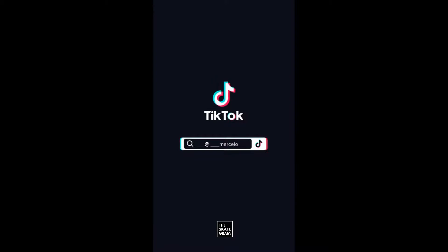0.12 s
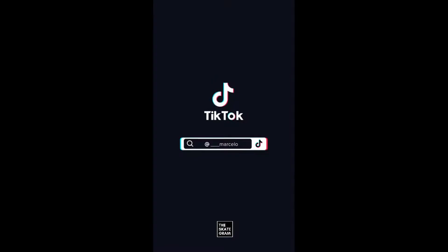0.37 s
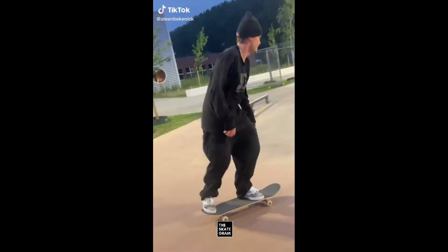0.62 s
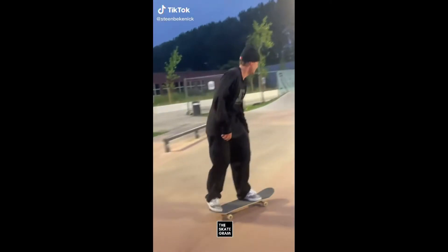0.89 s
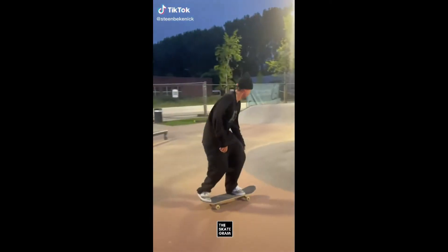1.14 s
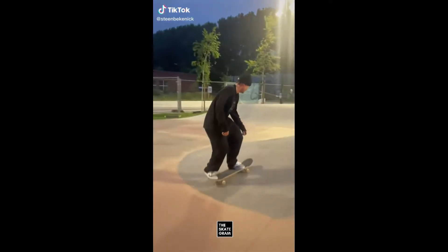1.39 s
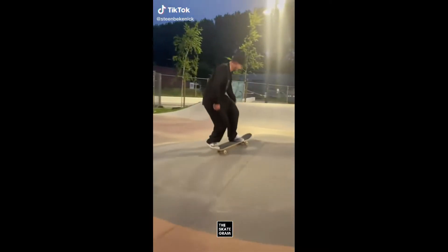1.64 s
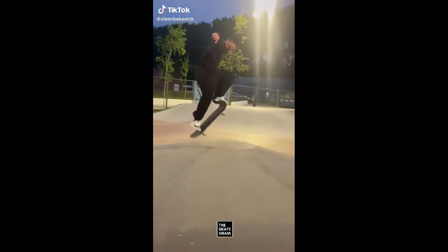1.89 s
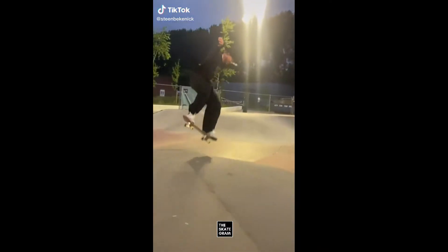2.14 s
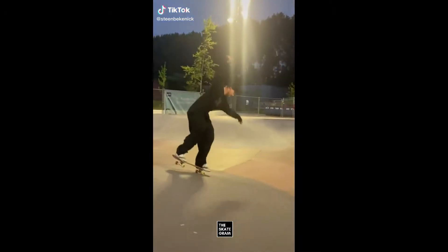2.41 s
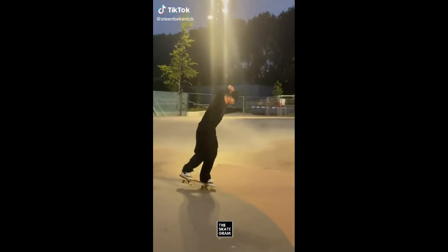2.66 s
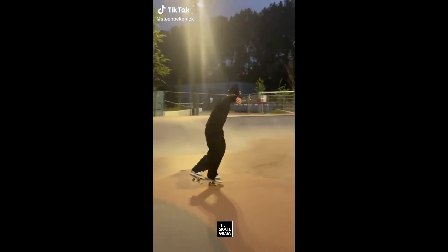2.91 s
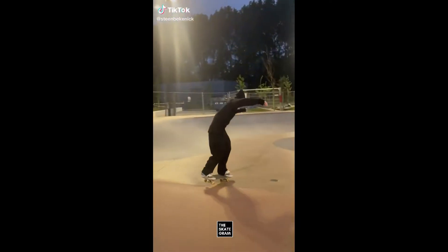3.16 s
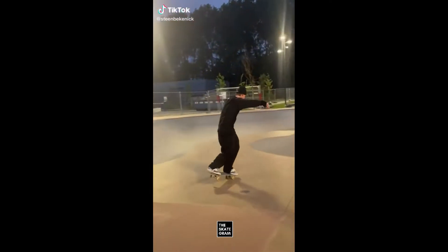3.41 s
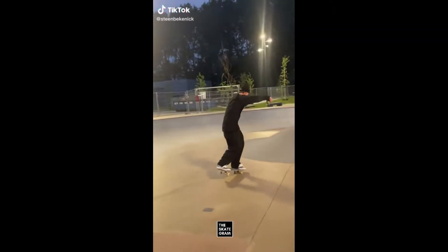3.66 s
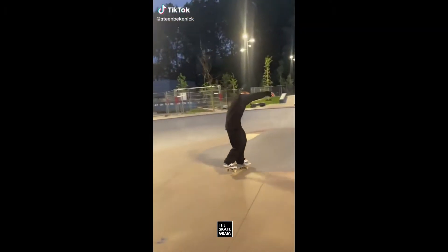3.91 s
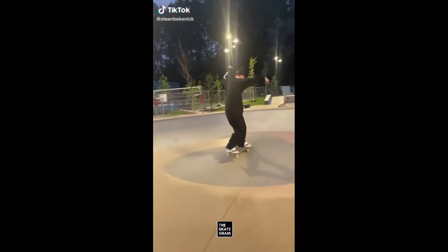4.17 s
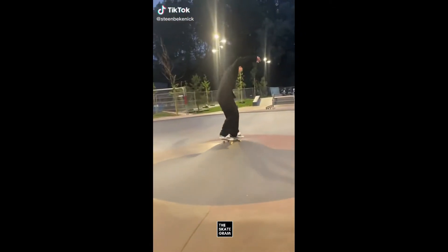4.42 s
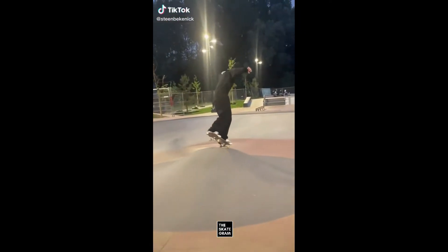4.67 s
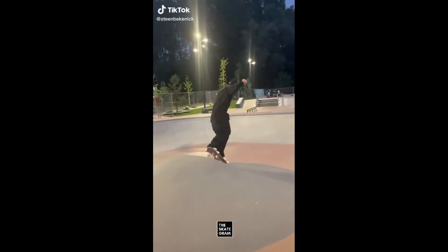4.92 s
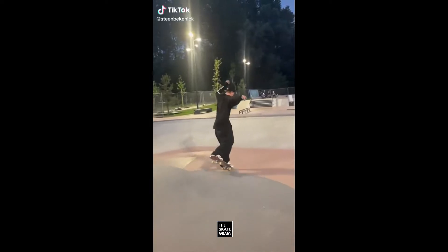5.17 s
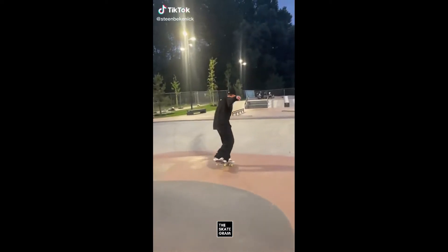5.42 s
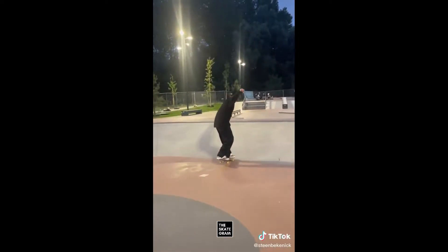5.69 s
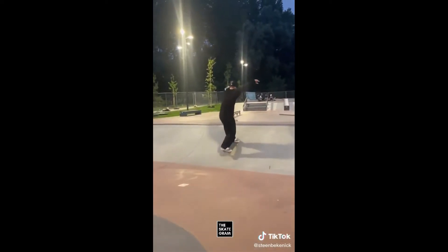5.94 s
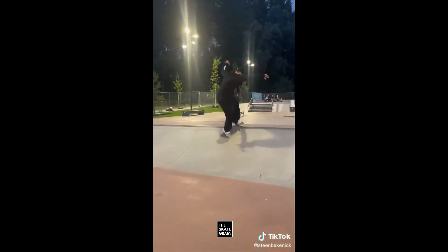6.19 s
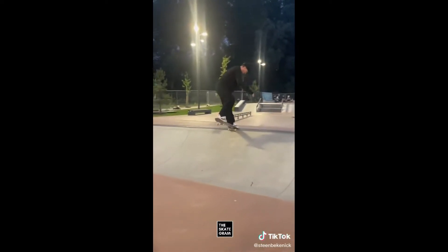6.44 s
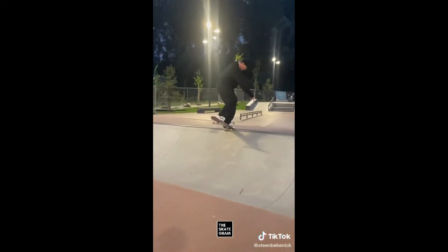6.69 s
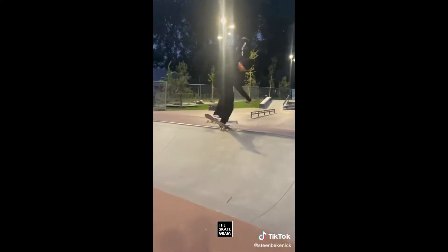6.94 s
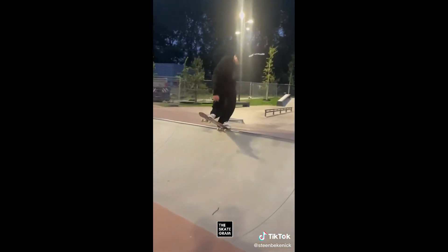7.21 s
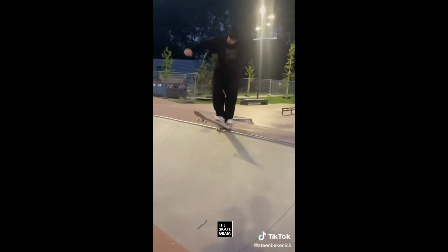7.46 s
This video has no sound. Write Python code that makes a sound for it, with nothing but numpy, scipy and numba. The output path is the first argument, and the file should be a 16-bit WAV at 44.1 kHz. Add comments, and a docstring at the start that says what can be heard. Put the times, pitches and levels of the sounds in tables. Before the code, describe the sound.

A short silence, then sound cuts in abruptly at full level. Close on the left, hard skateboard wheels drone over rough concrete, slowing gradually, knocking on joints. Further off in the centre, a second board hisses, pops and lands around two seconds, then cracks loudly past six. Low wind buffets the handheld phone microphone in an open skate park, with faint short echoes from ramps.

```python
"""A concrete skate park at dusk: a phone, held by a rider on one board, follows a skater on another.
After a silence everything cuts in at once. Close by on the left, wheels drone as grit and worn treads
shake the board, and joints knock it. The ride's wind, low filtered noise, buffets the microphone.
Further off in the middle, a second board roars and hisses as coloured grit; its blows ring deck modes
as pops and clacks, later as low slaps and a metal chatter, and ramps send short echoes back."""
import sys
import numpy as np
from scipy import signal
from scipy.fft import rfft, irfft, next_fast_len
from scipy.io import wavfile
from scipy.ndimage import uniform_filter1d
from numba import njit

SR = 44100
rng = np.random.default_rng(int(sys.argv[2]) if len(sys.argv) > 2 else 0)


def transcribe(u):
    """Save the signal u as a 16-bit wav file named by the first command-line argument.

    u: samples, shape (n,) or (channels, n), limited to [-1, 1]; the rate is SR.
    q: integer samples, one column per channel.
    """
    v = np.clip(np.atleast_2d(u).T, -1, 1)
    q = np.round(v * 32767).astype(np.int16)
    wavfile.write(sys.argv[1], SR, q)


def voltage_ratio(level):
    """Linear amplitude factor for a level in decibels (scalar or array-like)."""
    return 10 ** (np.asarray(level, float) / 20)


N = 334278
SIDES = np.array([[1], [-1]])  # the same sound, opposed between left and right


def curves(table):
    """Columns of a table after its times, drawn as straight lines to one value per sample."""
    s, *columns = np.transpose(table)
    return [np.interp(np.arange(N) / SR, s, c) for c in columns]


def unit(x):
    """Scale to rms 1."""
    return x / np.sqrt(np.mean(x ** 2))


def peak(x, db):
    """Scale so that the largest sample stands at db."""
    return voltage_ratio(db) * x / np.abs(x).max()


def colour(x, points):
    """Shape a spectrum by (Hz, dB) points, straight on a log frequency axis."""
    size = next_fast_len(N)
    hz, db = np.transpose(points)
    bins_hz = np.arange(size // 2 + 1) * SR / size + 1
    gain = voltage_ratio(np.interp(np.log(bins_hz), np.log(hz), db, left=-90, right=-90))
    return irfft(rfft(x, size) * gain, size)[..., :N]


def band(x, lo_hz, hi_hz, order):
    """Band-pass, steeper with the order."""
    return signal.sosfilt(signal.butter(order, [lo_hz, hi_hz], "band", fs=SR, output="sos"), x)


def ring(x, hz, width):
    """Two-pole resonance, gain 1 at its centre."""
    return signal.lfilter(*signal.iirpeak(hz, hz / width, SR), x)


def walk(rate):
    """Random levels held 1 / rate s and smoothed twice, so that they wander."""
    k = int(SR / rate)
    held = np.repeat(rng.standard_normal(N // k + 1), k)
    return uniform_filter1d(uniform_filter1d(held, k), k)[:N]


def grit(rough_db):
    """Concrete under a wheel: noise whose grains differ in size."""
    grain = np.minimum(rng.exponential(size=N), 7)
    return unit(rng.standard_normal(N) * voltage_ratio(rough_db * grain))


def ears(x, pan_db):
    """Place a sound by its left-minus-right level."""
    left = voltage_ratio(pan_db)
    return x * 2 * np.array([left, np.ones_like(left)]).reshape(2, -1) / (1 + left)


# turning of the near wheels: time_s, turn_ms (time of one turn)
WHEEL_TURNS = [(.9, 34.5), (1.45, 33), (2.0, 33.5), (2.4, 38.7), (2.7, 39.8), (3.15, 42.8), (3.4, 43.9),
               (4.2, 44.1), (4.55, 44.8), (4.9, 46.8), (5.2, 47.6), (5.5, 48.9), (6.05, 50.5), (6.9, 52),
               (7.58, 54)]
# worn treads: turn_rate (against the first wheel), level_db (against the grit)
WORN_TREADS = [(1, -10.5), (1.06, -15)]


def treads():
    """Nicks and flat spots come round again with every turn of a wheel."""
    turn_ms, = curves(WHEEL_TURNS)
    turns = np.cumsum(1000 / turn_ms / SR)
    around = np.linspace(0, 1, 256, endpoint=False)
    surfaces = rng.standard_normal((len(WORN_TREADS), len(around)))
    return sum(voltage_ratio(level_db) * unit(np.interp(rate * turns, around, surface, period=1))
               for (rate, level_db), surface in zip(WORN_TREADS, surfaces))


# resonances of the near board, three of the deck, then the wheels, then three of the trucks:
# pitch_hz, width_hz, level_db
NEAR_MODES = [(167, 34, -4), (218, 74, 0.5), (300, 49, -7), (453, 120, -8), (500.5, 110, 5.5),
              (562, 113, 2), (659, 84, -2), (717, 43, -1.5), (819, 60, 10.5), (930, 100, -0.5),
              (1049, 140, 4.5)]
# bands that deck, wheels and trucks hand on to the air: low_hz, high_hz
NEAR_BANDS = [(80, 343), (395, 773), (760, 1355)]


def near_parts(shake, order):
    """Deck, wheels and trucks, each ringing on the same shaking."""
    groups = NEAR_MODES[:3], NEAR_MODES[3:-3], NEAR_MODES[-3:]
    parts = []
    for modes, edges in zip(groups, NEAR_BANDS):
        ringing = sum(voltage_ratio(level_db) * ring(shake, hz, width_hz) for hz, width_hz, level_db in modes)
        parts.append(band(ringing, *edges, order))
    return parts


# near board rolling: time_s, drone_db (wheels),
# coarse_db (deck over drone, shaken by coarse ground), lean_db (trucks over drone, buzzing under lean)
NEAR_ROLL = [(.72, -24, -20.5, -22), (.88, -22.5, -17.5, -19), (.99, -25.5, -21, -19),
             (1.06, -24, -16.5, -20.5), (1.23, -25.5, -19, -18), (1.33, -25.5, -22, -16),
             (1.44, -27.5, -6.5, -13), (1.7, -27, -12.5, -10.5), (1.89, -28, -14, -13),
             (1.98, -28, -16, -10.5), (2.08, -29.5, -20, -14), (2.19, -29, -18, -17),
             (2.3, -29.5, -12, -15), (2.78, -26.5, -12, -20.5), (3.2, -25.5, -12, -24),
             (3.77, -26.5, -6.5, -19.5), (4.0, -25, -9, -21), (5.0, -25, -10.5, -20.5),
             (5.36, -25.5, -7.5, -15.5), (5.94, -24.5, -7.5, -18), (6.2, -24.5, -9.5, -17.5),
             (6.61, -25.5, -4.5, -17), (7.04, -24, -10, -18), (7.39, -26, -5.5, -16.5),
             (7.58, -24.5, -6, -13.5)]


def near_roll():
    """Grit and worn treads shake the board all the time; returns deck, drone and trucks."""
    drone_db, coarse_db, lean_db = curves(NEAR_ROLL)
    shake = (grit(rough_db=2.5) + treads()) * voltage_ratio(1.13 * walk(35))
    deck, drone, truck = near_parts(shake, order=5)
    deck_db = drone_db + coarse_db + walk(14)  # rumble swings over bumps
    return voltage_ratio(deck_db) * unit(deck), voltage_ratio(drone_db) * unit(drone), voltage_ratio(drone_db + lean_db) * unit(truck)


# near wheels over joints and grit: start_s, peak_db (wheels), thud_db (deck over wheels),
# tick_db (rattle over wheels; it also sets the trucks' clank), push_ms (decay of the push)
JOINTS = [(0.674, -19.5, -6, -43, 2.4), (0.997, -12, -11, -48, 1.3), (1.478, -22, -11, -31, 1.5),
          (1.747, -15, -10.5, -44, 4.3), (1.8386, -11.5, -36, -24, 5.7), (1.86, -16, -34, -40, 2.2),
          (2.408, -15.5, -34, -42, 2.2), (2.718, -6.5, -37, -31, 2.6), (2.846, -11, -44, -44, 1.3),
          (2.861, -22, -1, -29, 10), (3.626, -9.5, -25, -35, 11), (3.905, -18.5, 2, -34, 4.5),
          (4.013, -27, -23, -37, 2.6), (4.324, -13.5, -36, -38, 7.3), (4.649, -34, -9, -28, 1.1),
          (5.207, -15, -44, -30, 1.6), (5.256, -14.5, -22, -35, 0.98), (5.348, -15.5, -26, -38, 1.6),
          (5.614, -19, -25, -41, 2.2), (5.688, -13, -34, -30, 3.4), (5.697, -4.5, -16.5, -33.5, 5.9),
          (5.733, -8, -19, -33, 5.2), (5.805, -18.5, -26, -26, 4.7), (6.4, -15.5, -22, -48, 2.2),
          (6.428, 1, -38, -25, 7.9), (6.438, 0.5, -8, -55, 4.5), (6.569, -29, -14, -21, 3.4),
          (6.596, 1, -14.5, -30.5, 6), (6.6015, -4.5, -1.5, -31, 0.85), (6.625, -9.5, -32, -36, 8.3),
          (6.652, -11, -25, -30, 1.5), (6.694, -33, 10, -37, 4.7), (6.728, -20, -6, -24, 1.1),
          (6.943, -14, -11, -36, 2.3)]


def near_knocks():
    """Each joint is a sharp edge, then a short rattle; both ring deck, wheels and trucks."""
    t = np.arange(4096) / SR
    deck, drone, truck = np.zeros((3, N))
    chances = rng.standard_normal((len(JOINTS), 4096))
    for (start_s, peak_db, thud_db, tick_db, push_ms), chance in zip(JOINTS, chances):
        rattle = chance * np.exp(-t / (push_ms / 1000))
        push = band(0.12 * rattle + (t == 0), 70, 910, order=2)
        thud, knock, clank = near_parts(push, order=2)
        tick = band(rattle, 1300, 6700, order=2)
        i = int(start_s * SR)
        drone[i:i + 4096] += peak(knock, peak_db)
        deck[i:i + 4096] += peak(thud, peak_db + thud_db)
        truck[i:i + 4096] += peak(clank, peak_db + 0.66 * tick_db + 4.0)
        truck[i:i + 4096] += peak(tick, peak_db + tick_db)
    return deck, drone, truck


# near board against the turning phone: time_s, pan_db (left minus right, for the wheels)
PHONE_TURN = [(.7, 5.5), (1.0, 8.5), (1.8, 7.5), (2.6, 9), (4.2, 10), (5.4, 9), (6.3, 9.5), (7.58, 10)]


def near_board():
    """Rolling and knocks close by on the left; the pan differs by part and late copies widen it."""
    deck, drone, truck = [roll + knock for roll, knock in zip(near_roll(), near_knocks())]
    pan_db, = curves(PHONE_TURN)
    # the phone's body shades the right port less in the bass, so the deck leans left less
    placed = ears(drone, pan_db) + ears(deck, 0.3 * pan_db) + ears(truck, 1.67 * pan_db)
    # a faint copy 20 ms late, opposed and mostly on the right
    spread = voltage_ratio(-16.5) * np.roll(drone + deck, 900) * np.array([[.3], [-1]])
    # the trucks reach the right port 11 ms late, off the ground
    off_ground = voltage_ratio(-8.0) * np.roll(truck, 500) * np.array([[0], [1]])
    return placed + spread + off_ground


# gusts on the microphone: top_s, level_db, width_ms (from the top down to 1/e)
WIND_GUSTS = [(.75, -37, 210), (0.961, -33.5, 27), (1.15, -41, 116), (1.44, -37, 68), (1.57, -56, 140),
              (1.72, -33.5, 220), (2.3, -49, 180), (2.64, -41, 36), (2.76, -31.5, 21), (2.9, -39, 103),
              (3.33, -47.5, 24), (3.42, -57, 27), (5.16, -44, 13), (5.73, -56, 80), (6.52, -29, 11),
              (6.61, -26.5, 15), (6.72, -32, 52), (6.89, -32, 100), (6.99, -37, 12), (7.2, -42, 96)]
# spectrum of the buffeting: pitch_hz, level_db
WIND_SPECTRUM = [(20, -33), (35, -23), (50, 3), (75, -3.5), (110, 0.5), (200, -9.5), (400, -5.5)]


def wind():
    """Low buffeting, a wandering breeze with gusts on top, almost the same at both ports."""
    t = np.arange(N) / SR
    strength = voltage_ratio(-51.5 + 3 * walk(4.1))
    for top_s, level_db, width_ms in WIND_GUSTS:
        strength += voltage_ratio(level_db) * np.exp(-((t - top_s) * 1000 / width_ms) ** 2)
    air = rng.standard_normal(N) + 0.21 * rng.standard_normal(N) * SIDES
    return strength * voltage_ratio(2.0 * walk(16)) * unit(colour(air, WIND_SPECTRUM))


def wide_grit(share):
    """Grit in the middle with a share of noise opposed between the sides."""
    return grit(rough_db=2.0) + share * rng.standard_normal(N) * SIDES


# far board rolling: time_s, roar_db,
# hiss_db (over the roar; high when the board is close or the wheels skid)
FAR_LEVELS = [(.95, -50, -2), (1.21, -52.5, -0.5), (1.52, -49.5, -2.5), (1.85, -47.5, -8.5),
              (2.02, -51, -9.5), (2.3, -53, -5), (2.67, -52.5, -4.5), (3.03, -49.5, -7.5), (3.41, -49, -8),
              (4.07, -47.5, -7), (4.3, -47, -10), (4.5, -48.5, -14), (4.66, -48.5, -11), (4.8, -47, -12),
              (5.0, -48.5, -8.5), (5.18, -47.5, -5), (5.3, -45, -6), (5.45, -45, -8.5), (5.6, -45.5, -7),
              (5.94, -47.5, -6), (6.14, -45, -11), (6.34, -49.5, -6), (6.65, -46, -6.5), (6.78, -48, -11),
              (7.0, -46, -13), (7.25, -46.5, -14), (7.36, -47, -7.5), (7.52, -41.5, -5), (7.58, -43, -7.5)]
# spectra of the roar, the hiss and the finest hiss: pitch_hz, level_db
ROAR_SPECTRUM = [(1000, -39), (1300, -0.5), (1600, 6), (2000, 5.5), (2350, 7), (2700, 0.5), (3300, -7.5),
                 (4000, -4)]
HISS_SPECTRUM = [(2500, -8), (3500, -5), (5000, -3), (6800, -9), (7200, -35)]
FINE_SPECTRUM = [(8200, -13), (8600, -4.5), (12900, -13), (13300, -34), (14300, -28.5), (14700, -12),
                 (15800, -11.5)]


def far_roll():
    """Wheels rolling at a distance: grit heard as a roar, a hiss and a finest hiss, wider with pitch."""
    roar_db, hiss_db = curves(FAR_LEVELS)
    fine_db = -2 + 1.44 * hiss_db  # swings further than the hiss
    roar = voltage_ratio(roar_db + 1.5 * walk(60)) * unit(colour(wide_grit(0.31), ROAR_SPECTRUM))
    hiss = voltage_ratio(roar_db + hiss_db + 2.0 * walk(30)) * unit(colour(wide_grit(0.39), HISS_SPECTRUM))
    fine = voltage_ratio(roar_db + fine_db + 3.8 * walk(24)) * unit(colour(wide_grit(0.73), FINE_SPECTRUM))
    return roar + hiss + fine


# echoes from ramps and rails: late_ms, level_db
RAMP_ECHOES = [(4.1, -21), (6.7, -22), (9.8, -24), (13.3, -25), (18.1, -27), (24.5, -29)]


def ramp_echoes(far):
    """Ramps and rails send the far board back late and faint, every other echo with sides swapped."""
    echoes = 0
    for k, (late_ms, level_db) in enumerate(RAMP_ECHOES):
        sides = far[::-1] if k % 2 == 0 else far
        echoes = echoes + voltage_ratio(level_db) * np.roll(sides, int(late_ms * SR / 1000), axis=1)
    return echoes


RISE_MS = .8  # shortest rise of a blow; the hard contact comes this late
BELOW, ABOVE = .55, 1.7  # clacks and slaps are band-passed between these multiples of their centre
MIDDLE_PAN_DB = 3  # left minus right of the far slaps, and of clacks centred on 2 kHz


def blow(length_ms):
    """Force of one blow: a quick rise, slower for a long blow, and a rounded fall."""
    t = np.arange(8192) / SR * 1000
    rise_ms = RISE_MS + .17 * length_ms
    return np.where(t < rise_ms, t / rise_ms, np.exp(-((t - rise_ms) / length_ms) ** 2))


def board_modes(force, table):
    """Each mode of the far board, rung by one hard contact and a scraping force."""
    contact = np.arange(len(force)) == int(RISE_MS * SR / 1000)
    force = force + 8 * contact
    # a mode that falls 60 dB in t60 has a width of ln(1000) / (pi t60)
    return [voltage_ratio(level_db) * np.sqrt(t60_s) * ring(force, hz, np.log(1000) / np.pi / t60_s)
            for hz, level_db, t60_s in table]


# resonances of the far deck (the first five) and trucks: pitch_hz, level_db, t60_s
FAR_MODES = [(202, -4.5, 0.043), (270, 4.5, 0.046), (352, 0.5, 0.067), (545, 3, 0.02), (740, 3, 0.01),
             (815, 16, 0.022), (1157, 11.5, 0.014), (1490, 4, 0.0163), (1674, 0.5, 0.018), (1885, 2, 0.012),
             (2200, 3.5, 0.012), (2820, 0, 0.027), (3203, -2, 0.017), (3740, 0, 0.0071), (4220, -3, 0.007),
             (4990, -0.5, 0.021), (5540, -4.5, 0.012), (6180, -7, 0.01)]
# far pops, clacks and scrapes: start_s, peak_db, spray_db (treble noise over peak),
# centre_hz (of the ring), length_ms
FAR_BLOWS = [(0.829, -41.5, 2.5, 5000, 16), (0.835, -29, -16, 1670, 12), (0.851, -28.5, -12.5, 1340, 11),
             (0.908, -26, -17, 1580, 14), (0.91, -37, -13, 2600, 11), (0.925, -35, -21, 1280, 8),
             (1.801, -30, -22.5, 1490, 4), (1.8132, -20, -24, 2300, 2), (1.814, -27, -21, 1350, 2.5),
             (1.816, -25, -24, 2720, 1.6), (1.813, -27.5, -15, 4930, 2.3), (1.84, -22, -27.5, 1170, 5),
             (2.2247, -24.5, -11, 800, 3.7), (2.227, -21, -14.5, 1500, 7.2), (2.2242, -21, -20, 3700, 1.5),
             (2.2305, -17.5, -31, 970, 2.2), (2.229, -18, -1, 5000, 1.1), (2.229, -20.5, -20, 2800, 2),
             (2.231, -27.5, -4.5, 2350, 15), (2.246, -26.5, -20.5, 2200, 2.4), (2.707, -34.5, -10, 1980, 8),
             (3.089, -48.5, -1.5, 3460, 27), (3.8992, -24, -13, 1370, 13.5), (4.26, -33, -0.5, 4500, 2.8),
             (4.26, -33.5, -20, 2100, 3), (4.681, -32.5, -11, 4080, 2.5), (4.681, -28, -20, 1700, 2.3),
             (4.71, -29.5, -11, 3830, 2.3), (4.711, -27, -15.5, 1470, 6.3), (5.182, -29.5, -19, 1600, 4.4),
             (5.195, -29.5, -24.5, 1810, 3.4), (5.299, -31.5, -23, 1700, 6), (5.317, -33, -24, 1900, 3.1),
             (5.4432, -29, -16, 1850, 9.1), (6.1238, -27, -15, 2670, 3.3), (6.125, -33.5, -1.5, 6360, 2.7),
             (6.203, -41.5, -15, 5300, 16), (6.2263, -5, -22, 2940, 0.55),
             (6.2275, -18.5, -17.5, 5330, 1.1), (6.2273, -8, -28.5, 2080, 1.8),
             (6.232, -16.5, -25, 1700, 1.6), (6.234, -29, -2.5, 3700, 10), (6.245, -26.5, -4.5, 4200, 20),
             (6.2512, -25, -8.5, 3500, 5.9), (6.244, -21, -11, 1500, 7.5), (6.252, -16, -18.5, 1160, 9.9),
             (6.258, -19, -17, 970, 3.6), (6.272, -32.5, -1.5, 3600, 4.3), (6.4988, -25, -19, 2700, 2.3),
             (6.505, -28.5, -6, 2480, 7.7), (6.503, -21.5, -23.5, 1640, 5.8),
             (6.5035, -25.5, -24, 5500, 1.8), (6.506, -14, -31.5, 910, 4.6), (6.636, -35, -8, 3000, 6.9),
             (7.351, -41, -11, 5400, 2.2), (7.419, -30, -14.5, 1510, 15), (7.451, -31.5, -11, 1790, 16),
             (7.481, -34.5, -19.5, 4700, 3), (7.533, -28.5, -28, 2050, 12), (7.533, -35, -9.5, 4970, 11)]


def far_clacks():
    """Blows wake the board's modes near a centre, thump its low modes and spray treble noise."""
    out, spray = np.zeros((2, 2, N + 8192))
    chances = rng.standard_normal((len(FAR_BLOWS), 3, 8192))
    signs = np.resize([1, -1], len(FAR_MODES))
    for (start_s, peak_db, spray_db, centre_hz, length_ms), chance in zip(FAR_BLOWS, chances):
        shape = blow(length_ms)
        modes = board_modes(chance[0] * shape, FAR_MODES)
        thump = sum(modes[:5])
        clack = 0
        for (hz, _, _), mode, sign in zip(FAR_MODES[5:], modes[5:], signs):
            # 15 dB less for every octave away from the centre
            clack = clack + voltage_ratio(-15 * abs(np.log2(hz / centre_hz))) * mode * sign
        clack = band(clack, BELOW * centre_hz, ABOVE * centre_hz, order=2)
        body = peak(clack, peak_db) + peak(thump, peak_db - 15)
        pan_db = MIDDLE_PAN_DB - 2 * np.log2(centre_hz / 2000)  # moves right as the centre rises
        noise = chance[1] + 0.44 * chance[2] * SIDES
        i = int(start_s * SR)
        out[:, i:i + 8192] += ears(body, pan_db)
        spray[:, i:i + 8192] += voltage_ratio(peak_db + spray_db) * shape * noise
    spray_points = [(900, -20.5), (2000, -5.5), (3000, 1.0), (4500, 0.0), (6800, -0.5), (8700, 3.5),
                    (13000, -2.0), (15800, -3.5)]  # (Hz, dB)
    return out[:, :N] + colour(spray[:, :N], spray_points)


# far deck slaps down: start_s, peak_db, centre_hz (of the boom), length_ms
DECK_SLAPS = [(2.2256, -11.5, 680, 4.1), (2.232, -14, 270, 8), (2.242, -15, 500, 6), (3.899, -28, 270, 3.1),
              (4.259, -33, 400, 4.9), (6.125, -30, 400, 3.7), (6.262, -10, 705, 5), (6.506, -16, 300, 8.9)]


def far_slaps():
    """The far deck slaps down and its five lowest modes boom."""
    out = np.zeros((2, N))
    chances = rng.standard_normal((len(DECK_SLAPS), 8192))
    for (start_s, peak_db, centre_hz, length_ms), chance in zip(DECK_SLAPS, chances):
        modes = board_modes(chance * blow(length_ms), FAR_MODES[:5])
        boom = band(sum(modes), BELOW * centre_hz, ABOVE * centre_hz, order=2)
        i = int(start_s * SR)
        out[:, i:i + 8192] += ears(peak(boom, peak_db), MIDDLE_PAN_DB)
    return out


# a loose metal part on the far trucks: start_s, peak_db
METAL_CHATTER = [(5.4405, -35), (5.447, -36), (5.455, -37), (5.464, -34.5), (5.4725, -33), (5.482, -37),
                 (5.4935, -36)]
# its resonances: pitch_hz, level_db, t60_s
METAL_MODES = [(1730, 5, .025), (2990, -8, .02), (3715, -2, .025), (5250, -8, .01), (6340, -1, .016)]


def far_chatter():
    """A loose metal part chatters on the far trucks: short blows ring its own modes."""
    out = np.zeros((2, N))
    chances = rng.standard_normal((len(METAL_CHATTER), 8192))
    for (start_s, peak_db), chance in zip(METAL_CHATTER, chances):
        chink = sum(board_modes(chance * blow(length_ms=6.1), METAL_MODES))
        i = int(start_s * SR)
        out[:, i:i + 8192] += peak(chink, peak_db)
    return out


def scene():
    """Near board, wind, and the far board with its echoes from the ramps."""
    near = near_board()
    gusty = wind()
    far = far_roll() + far_clacks() + far_slaps() + far_chatter()
    return near + gusty + far + ramp_echoes(far)


# spectrum of the whole sound, the treble dips near 8 kHz and ends at 15.8 kHz: pitch_hz, level_db
WHOLE_SPECTRUM = [(10, -2.5), (6900, -1), (7150, -7.5), (8200, -15.5), (8500, -9), (15800, -5),
                  (15900, -67)]


def shape_whole(dry):
    """A filter colours the whole sound: the treble dips near 8 kHz and ends at 15.8 kHz."""
    return colour(dry, WHOLE_SPECTRUM)


@njit
def follow(size, attack, release):
    """Level that rises fast and sinks slowly."""
    out, level = np.empty(len(size)), 0.
    for i in range(len(size)):
        level += (size[i] - level) * (attack if size[i] > level else release)
        out[i] = level
    return out


def limiter(heard):
    """Ducks both sides by 0.32 dB per dB of followed level over -13 dB, so loud knocks dip the rest."""
    attack_s, release_s = 0.0017, 0.071
    level = follow(np.abs(heard).max(axis=0), 1 / (attack_s * SR), 1 / (release_s * SR))
    return heard * np.minimum(1, voltage_ratio(-13) / (level + 1e-9)) ** 0.32


def band_limit(x):
    """A steep low-pass at the top of the band."""
    return signal.sosfilt(signal.butter(12, 16150, fs=SR, output="sos"), x)


def record(dry):
    """Silence, then the sound cuts in; a filter colours it, a limiter ducks it, its peaks are rounded."""
    start_s, fade_s = .659, 0.0022
    fade = np.clip((np.arange(N) / SR - start_s) / fade_s, 0, 1)
    heard = limiter(shape_whole(dry) * fade)
    mix = heard / (1 + np.abs(heard) ** 4) ** 0.17
    return band_limit(mix)


dry = scene()
out = record(dry)
transcribe(out)
```